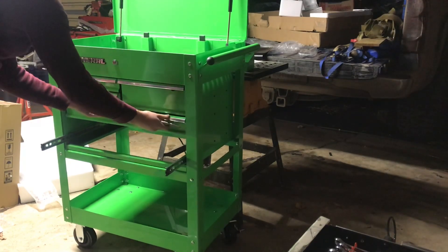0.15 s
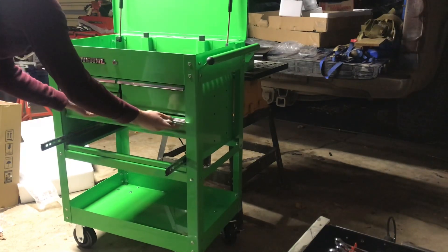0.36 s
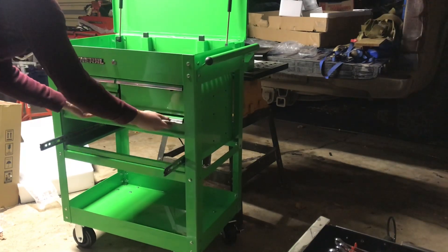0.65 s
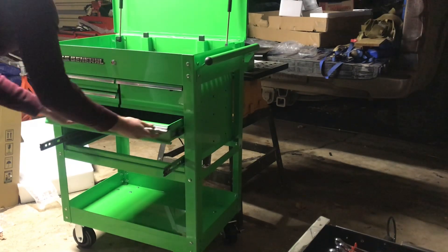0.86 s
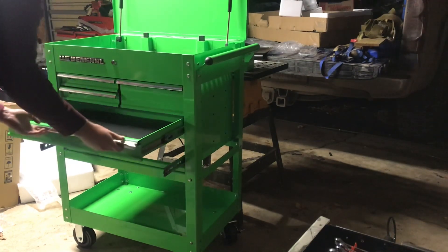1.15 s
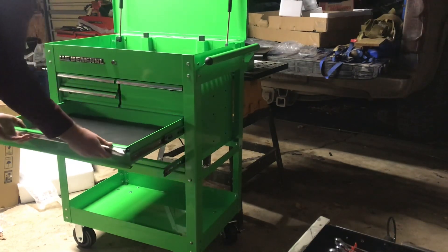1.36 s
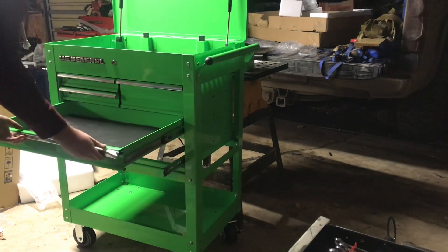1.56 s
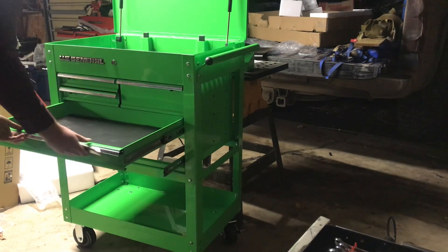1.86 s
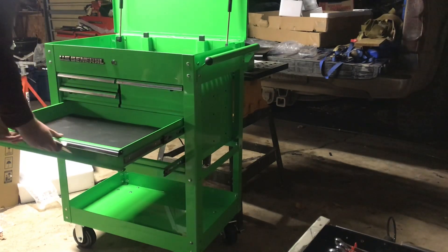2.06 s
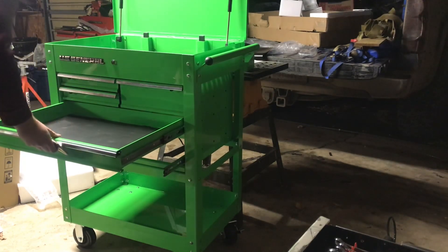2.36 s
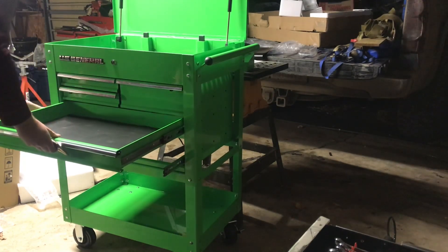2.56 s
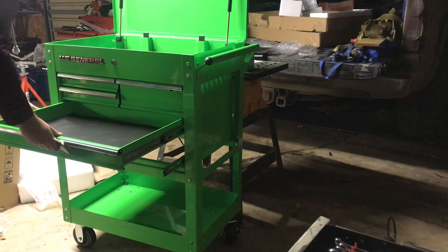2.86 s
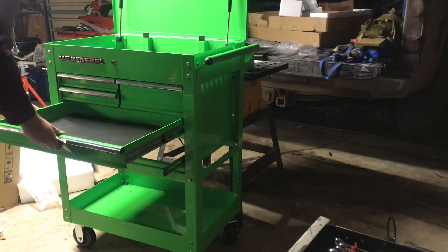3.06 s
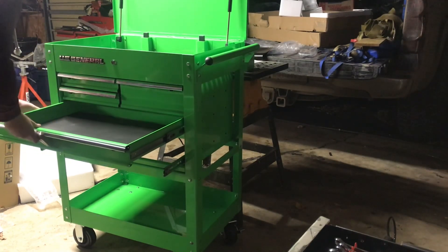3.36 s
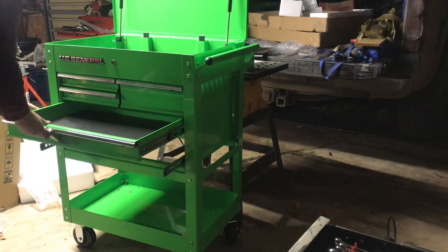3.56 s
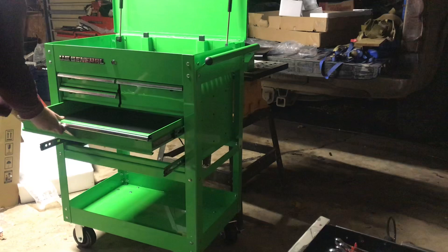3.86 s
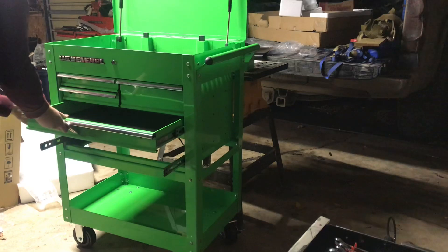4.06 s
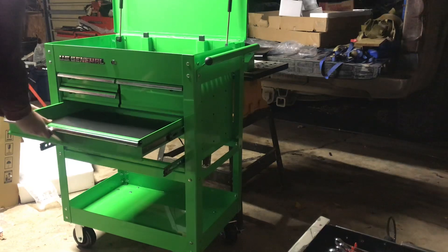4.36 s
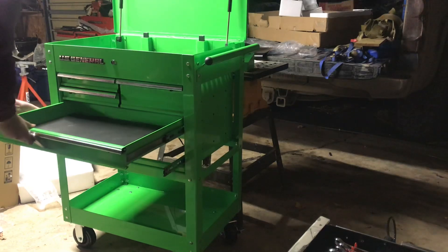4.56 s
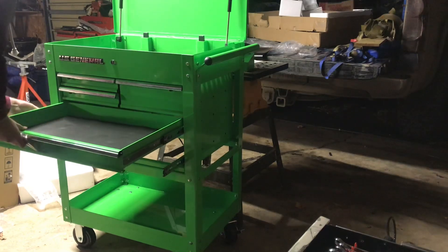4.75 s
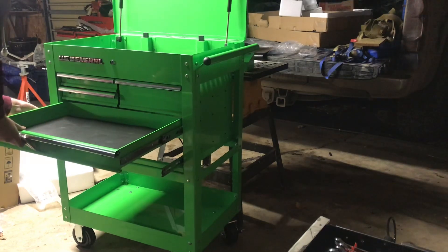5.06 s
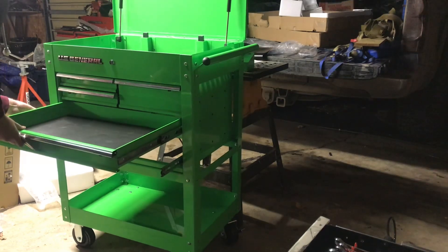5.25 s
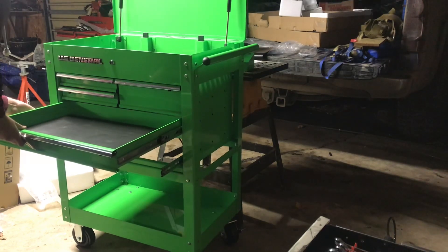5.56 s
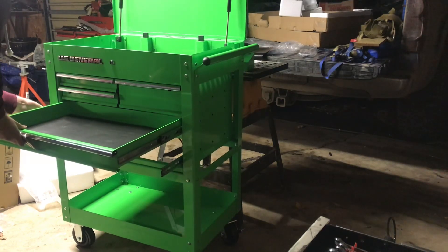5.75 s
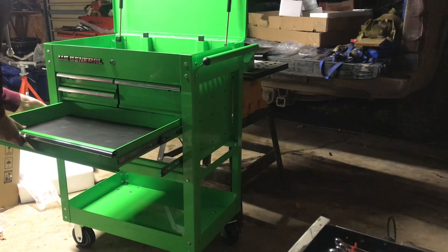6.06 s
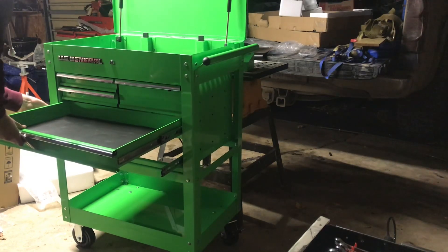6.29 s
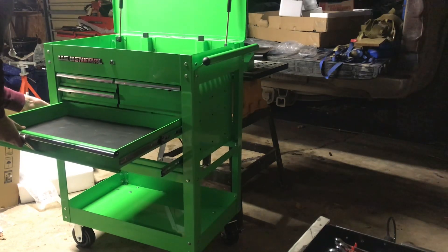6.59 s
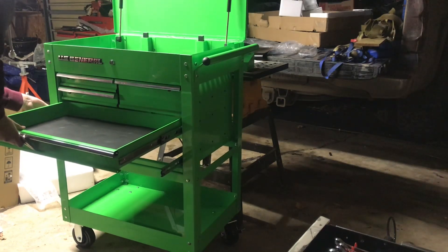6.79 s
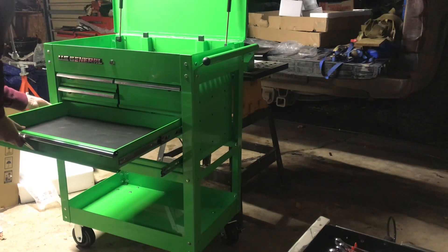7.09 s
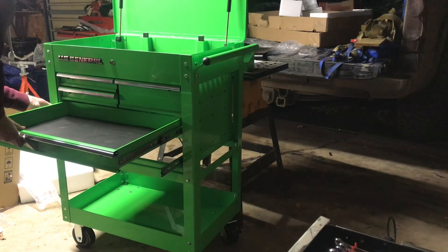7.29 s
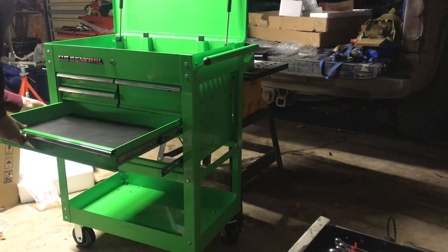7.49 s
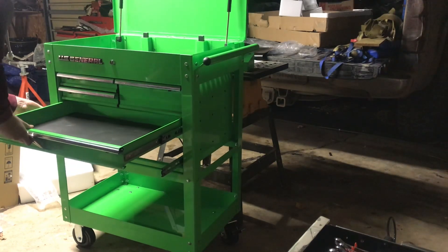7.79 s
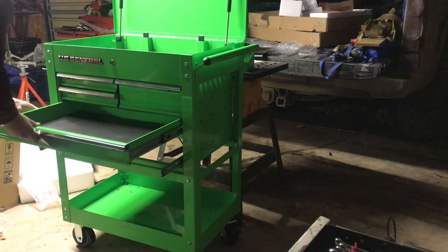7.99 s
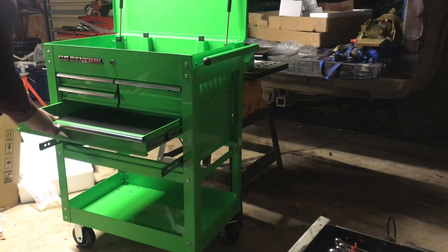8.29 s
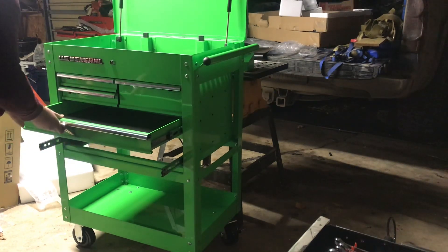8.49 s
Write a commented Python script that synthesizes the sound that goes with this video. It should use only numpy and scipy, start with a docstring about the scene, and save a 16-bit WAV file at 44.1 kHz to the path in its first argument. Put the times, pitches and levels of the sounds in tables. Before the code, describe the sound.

Close, mono view of an empty steel drawer on a tool cart in a quiet garage, over faint hiss and distant low rumble. From 0.06 to 0.23 s a rapid cluster of loud, bright clanks with chattering rattle and low thumps rings the thin sheet metal. Smaller clacks come at 0.5-0.6 s, then a gritty rolling scrape on ball slides from 0.7 to 1.6 s with light knocks near 1.1 s. A clack at 1.7 s; a firmer hollow clunk at 2.2 s. Quiet, with slight rubs, until about 3.2 s. Scraping swells from 3.4 to 4.8 s, in and out, ending in a hard knock at 4.83 s with a low ring. Then mostly faint rubs and ticks: a strong ringing clank at 5.75 s, soft taps near 7 s, a clunk at 7.5 s, a bright sharp clack at 8.02 s, and a small tick at 8.4 s before it fades by 8.6 s.

```python
"""In a quiet garage a steel drawer is worked out and in on the ball slides of a tool cart.
Rolling balls and rubbing rails, made as random knocks, excite the decaying modes of the sheet steel.
Stops and latches strike it in short bursts of chatter; single modes ring or sing alone as swelling tones.
Under it lie a low rumble and the hiss of room and microphone, both made of filtered noise."""
import sys
import numpy as np
from scipy import signal
from scipy.fft import rfft, irfft, next_fast_len
from scipy.io import wavfile
from scipy.ndimage import uniform_filter1d

SR = 44100
rng = np.random.default_rng(int(sys.argv[2]) if len(sys.argv) > 2 else 0)


def dump_mix(stems):
    """Bounce the given channels to the path in sys.argv[1] as a 16-bit WAV at rate SR."""
    frames = np.atleast_2d(stems).T  # one column per channel
    limited = np.clip(frames, -1, 1)  # hard clip at full scale
    pcm = np.round(limited * 32767).astype(np.int16)
    wavfile.write(sys.argv[1], SR, pcm)


N = 380583

# Single modes of the drawer. Each row: frequency in Hz, relative level in dB,
# 60 dB decay time in s before joints and liner limit it.
STEEL_MODES = [(143.5, -5.5, .45), (221, -10, 0.6), (305, -9.5, 1), (323, -1.76, 0.23), (376, -5.5, .4),
               (519, -7.5, 0.12), (592, -13.5, 0.11), (666, -5.5, 0.41), (626, -3.5, 0.75),
               (693.5, 4.66, 1), (747, -8, 0.2), (849, -8, 0.15), (972, 1.5, 0.9), (1040, 5.5, 0.62),
               (1057, -9, 0.51), (1267, -8, 0.34), (1420, -3, 0.57), (1478, 1, .3), (1473, -5, 0.6),
               (1695, -11, 0.87), (2200, -21, 0.083), (2530, -4.5, 0.75), (2594, -0.5, 0.66),
               (2756, -8.5, 0.41), (3140, -16.5, 0.25), (3740, -26, 0.071), (3120, -13.5, 0.022),
               (4000, -11.5, 0.59)]


def from_db(db):
    """Amplitude ratio: twenty decibels are a factor of ten."""
    return 10 ** (np.asarray(db) / 20)


def rms_one(x):
    """Normalisation to unit root-mean-square amplitude."""
    return x / np.sqrt(np.mean(x ** 2) + 1e-20)


def in_time(rows):
    """Envelopes: straight lines in time through the breakpoints of each column."""
    s, *columns = np.transpose(rows)
    return [np.interp(np.arange(N) / SR, s, column) for column in columns]


def at_hz(points_hz, values, hz):
    """Spectral interpolation on a logarithmic frequency axis, as pitch is heard."""
    return np.interp(np.log(np.maximum(hz, 1)), np.log(points_hz), values)


def coloured(x, spectrum):
    """Linear filtering: a table of (Hz, dB) weights the spectrum of x; the result has rms 1."""
    size = next_fast_len(len(x))
    hz = np.arange(size // 2 + 1) * SR / size
    gain = from_db(at_hz(*np.transpose(spectrum), hz))
    return rms_one(irfft(rfft(x, size) * gain, size)[:len(x)])


def band(x, low_hz, high_hz):
    """Band limitation by a Butterworth filter."""
    sos = signal.butter(2, [low_hz, high_hz], "band", fs=SR, output="sos")
    return signal.sosfilt(sos, x)


def grains(size, per_s, spread_db):
    """Shot noise: random contacts of uneven strength and either sign."""
    draw = rng.random((3, size))
    strength = from_db(-spread_db * np.log(draw[1] + .01)) * np.sign(draw[2] - .5)
    return (draw[0] < per_s / SR) * strength


def drift(rate):
    """Low-passed noise: a slow random wander of unit spread, with its corner at rate in Hz."""
    step = 40   # samples between computed points
    r = np.exp(-2 * np.pi * rate * step / SR)
    noise = rng.standard_normal(N // step + 2002)
    slow = signal.lfilter([1], [1, -2 * r, r * r], noise)[2000:]
    return np.interp(np.arange(N) / step, np.arange(len(slow)), rms_one(slow))


def steel():
    """Modal superposition: beating sines and noise bands, with their pitches and falls in dB."""
    # Countless close modes and the garage, heard as dying noise.
    # Each row: frequency in Hz, relative level in dB, 60 dB decay time in s.
    wash_table = [(150, -20, 0.66), (304, -15, .45), (500, -15, 0.55), (700, -16.5, 0.69), (1010, -10, .35),
                  (1420, -3, 0.2), (2090, -15.5, 0.32), (2593, -4, 0.27), (4867, -13.5, 0.28),
                  (7227, -8, 0.22), (9900, -13, 0.17), (14300, -5.5, 0.2), (15500, -8.5, 0.067)]
    t = np.arange(SR // 2) / SR
    hz, level_db, t60 = np.transpose(STEEL_MODES)
    t60 = np.minimum(t60, .12 + 110 / hz)   # joints and liner mat soak up the higher modes
    # each mode has a close twin, 8 to 30 Hz away
    beat = 1 + .5 * np.cos(2 * np.pi * (rng.uniform(8, 30, (len(hz), 1)) * t))
    modes = from_db(level_db - 8.0)[:, None] * beat * np.sin(2 * np.pi * hz[:, None] * t)

    edges = 110 * 2 ** np.arange(0, 7.4, 1 / 3)   # third-octave bands
    centres = np.sqrt(edges[1:] * edges[:-1])
    wash_hz, wash_db, wash_t60 = np.transpose(wash_table)
    wash = np.array([rms_one(band(rng.standard_normal(len(t)), low, high))
                     for low, high in zip(edges, edges[1:])])
    wash *= from_db(at_hz(wash_hz, wash_db, centres))[:, None]

    hz = np.r_[hz, centres]
    t60 = np.r_[t60, at_hz(wash_hz, wash_t60, centres)]
    return t, np.vstack([modes, wash]), hz, -60 * t / t60[:, None]


def ball_hiss(rails_db, hiss_db):
    """Shot noise of rolling contact: dense small impacts of the balls, coloured into a hiss."""
    # Spectrum of the balls. Each row: frequency in Hz, relative level in dB.
    ball_spectrum = [(2500, -15.5), (3600, -2), (5000, -5.5), (7500, -6.5), (10200, -10.5), (12800, -1),
                     (14300, -10.5), (16000, -9.5)]
    split_hz, gap_db, follows = 9000, 10, 0.42   # follows: dB of fill per dB of excess
    level = from_db(hiss_db + 1.2 * drift(14))
    hiss = level * coloured(grains(N, per_s=6400, spread_db=-2.0), ball_spectrum)
    lower = signal.sosfilt(signal.butter(2, split_hz, fs=SR, output="sos"), hiss)
    # below the split the hiss fills in as the rails outweigh the balls
    excess_db = np.clip(rails_db - hiss_db - gap_db, -15, 8)
    return hiss + lower * (from_db(follows * excess_db) - 1)


def sliding(t, rings, hz, fall_db):
    """Modal excitation by a travelling contact: ever other modes take the knocks on the rails."""
    # One list for each move of the drawer.
    # Each row: time in seconds, rails level in dB, ball hiss level in dB before wander and fill.
    moves = [
        [(0.0, -43, -65), (0.022, -57.5, -65), (0.035, -50, -65)],
        [(0.33, -45.5, -51), (0.406, -58.5, -66), (0.446, -48.5, -67), (0.505, -48, -63.5)],
        [(0.68, -49, -67.5), (0.722, -62, -70), (0.778, -47, -59), (0.806, -39.5, -48.5), (0.87, -48.5, -67.5),
         (0.954, -40, -54.5), (1.15, -45.5, -50), (1.176, -45.5, -52), (1.362, -46.5, -53), (1.602, -69.5, -71),
         (1.665, -79, -81.5)],
        [(1.87, -68, -70), (1.992, -61.5, -63.5), (2.054, -60, -69), (2.104, -59, -65.5), (2.15, -51, -63)],
        [(2.33, -79, -82), (2.632, -77, -89), (2.708, -70.5, -67), (2.766, -56, -77), (2.818, -63.5, -73),
         (2.876, -49.5, -62), (2.896, -57.5, -75), (3.004, -54.5, -70), (3.06, -66, -83), (3.14, -65.5, -79.5)],
        [(3.2, -67.5, -63.5), (3.366, -49, -57.5), (3.388, -55, -59.5), (3.456, -43, -57.5), (3.56, -53, -68),
         (3.632, -44.5, -57), (3.788, -48, -66.5), (3.822, -45, -61), (3.948, -47, -62), (3.986, -42.5, -68),
         (4.12, -67.5, -75)],
        [(4.16, -68, -82.5), (4.194, -55, -67), (4.384, -40, -55), (4.714, -44.5, -50.5), (4.8, -44.5, -62.5)],
        [(4.93, -72, -71), (4.952, -50, -56), (5.086, -73.5, -83.5), (5.136, -72, -75.5), (5.31, -51, -65),
         (5.33, -62, -76.5)],
        [(5.41, -67, -66.5), (5.458, -74.5, -75), (5.648, -80, -80), (5.658, -60.5, -67.5), (5.725, -52.5, -68)],
        [(5.86, -47.5, -64), (6.0, -51.5, -67), (6.1, -76, -84.5), (6.2, -84.5, -73.5)],
        [(6.25, -69, -79.5), (6.39, -73.5, -84.5), (6.424, -57, -72), (6.55, -51.5, -69.5), (6.654, -78.5, -85),
         (6.896, -78.5, -85), (6.95, -56, -73.5)],
        [(7.1, -64.5, -80), (7.182, -80, -96), (7.43, -80, -86), (7.46, -66, -68.5)],
        [(7.62, -56.5, -64), (7.7, -63.5, -66), (7.752, -66.5, -82.5), (7.8, -66, -64), (7.836, -51.5, -57.5),
         (7.91, -59, -74), (8.005, -49, -56)],
        [(8.17, -70.5, -60), (8.194, -62, -61), (8.36, -63.5, -61)],
        [(8.44, -72, -70), (8.54, -75, -84), (8.63, -79.5, -67)],
    ]
    # Rows: floor panel, side walls, rails, upper ring. Each row: level in dB at the usual levels,
    # share of the rails' swing, share of the balls' swing (dB per dB), wander in dB.
    part_levels = [(-59, 0.54, .1, 1), (-56.5, .9, .05, 1), (-53.5, 0.96, 0.054, 1.2),
                   (-64.5, .6, 0.6, 0.8)]
    # Frequencies in Hz between which the modes belong to one part after another.
    part_edges_hz = [200, 520, 860, 2000, 3600]
    usual_rails_db, usual_balls_db = -52, -62
    rails_db, hiss_db = in_time(np.vstack(moves))
    parts_db = []
    for usual_db, rails_share, balls_share, wander_db in part_levels:
        swing_db = rails_share * (rails_db - usual_rails_db) + balls_share * (hiss_db - usual_balls_db)
        parts_db.append(usual_db + swing_db + wander_db * drift(9))
    hiss = ball_hiss(rails_db, hiss_db)

    hop, part = 1024, np.searchsorted(part_edges_hz, hz)
    # hands on the drawer shorten the ring
    held = rings * from_db(fall_db - 60 * t / .2) * np.minimum(t / 0.0053, 1)
    held = held[:, :8192]
    hops = len(range(0, N, hop))
    travel = uniform_filter1d(rng.standard_normal((hops, len(hz))), size=4, axis=0) * 2
    share = from_db(2.5 * travel)
    energy = share ** 2 * np.sum(held ** 2, axis=1)
    for k, level_db in enumerate(parts_db):
        mine = part == k + 1
        # the modes of a part together carry its level
        gain = from_db(level_db[::hop]) / np.sqrt(energy[:, mine].sum(axis=1))
        share[:, mine] *= gain[:, None]
    share[:, (part == 0) | (part > len(parts_db))] = 0   # modes outside the parts stay silent

    grit = grains(N, per_s=1000, spread_db=3.5)
    knocks = np.pad(rms_one(grit) * from_db(.7 * drift(9.5)), (hop, 2 * hop))
    out, fade = np.zeros(N + 16 * hop), np.hanning(2 * hop)   # overlapping blocks crossfade
    for k, ring in enumerate(share @ held):
        sound = signal.fftconvolve(knocks[k * hop:(k + 2) * hop] * fade, ring)
        out[k * hop:k * hop + len(sound)] += sound
    return out[hop:N + hop] + hiss


def rumble():
    """Addition of powers: two wandering bands of low noise swell as heavy blows shake cart and concrete."""
    # Distant rumble. Each row: time in seconds, deep band in dB, low band in dB, before wander.
    rumble_levels = [(0, -62.5, -56.5), (.9, -61.5, -58.5), (1.6, -63, -64), (2.3, -61, -66),
                     (3.2, -63.5, -66), (4.2, -58.5, -62), (5.3, -62.5, -65.5), (6.1, -68, -66),
                     (6.9, -69, -70.5), (7.9, -64.5, -65.5), (8.63, -67, -68.5)]
    # Heavy blows. Each row: start in seconds, peak of the deep band in dB, of the low band in dB.
    shakes = [(.06, -65, -42), (.14, -48, -38.5), (.23, -44, -48), (.55, -68, -51.5), (1.05, -69, -50),
              (1.361, -54.5, -54.5), (1.85, -51, -70), (4.74, -38.5, -46.5), (5.75, -67, -47),
              (7.49, -57, -46)]
    # each pair: deep band, low band
    bands_hz, wanders_db = [(46, 62), (71, 180)], (1.5, 2)
    rises_s, t60s = (0.043, 0.018), (0.27, 0.67)
    out, t = 0, np.arange(N) / SR
    starts, *shakes_db = np.transpose(shakes)
    levels_db = in_time(rumble_levels)
    for k, (low_hz, high_hz) in enumerate(bands_hz):
        power = from_db(levels_db[k] + wanders_db[k] * drift(1.5)) ** 2
        for start, peak_db in zip(starts, shakes_db[k]):
            since = np.maximum(t - start, 0) / rises_s[k]   # in rise times
            after_s = np.maximum(since - 1, 0) * rises_s[k]
            power += (np.minimum(since, 1) * from_db(peak_db - 60 * after_s / t60s[k])) ** 2
        out = out + np.sqrt(power) * rms_one(band(rng.standard_normal(N), low_hz, high_hz))
    return out


def room_tone():
    """Stationary noise: the steady hiss of room and microphone."""
    # Spectrum of the hiss. Each row: frequency in Hz, relative level in dB.
    tone_spectrum = [(15, -25), (25, -8), (64, -3.5), (180, -4.5), (317, -4), (503, -14), (796, -9.5),
                     (1020, -8.5), (1890, -17.5), (6560, -21.5), (7710, -24), (12900, -14.5), (16000, -34)]
    return from_db(-68.5) * coloured(rng.standard_normal(N), tone_spectrum)


def chatter(t, decay_s):
    """Repeated impact: a first touch, the full blow and light bounces that die away."""
    burst = np.diff(grains(2001, per_s=2500, spread_db=-4.0))   # the difference favours treble
    burst = burst * np.exp(-t[:2000] / max(decay_s, 5e-4))
    burst = 1.2 * burst / np.linalg.norm(burst)
    burst[[rng.integers(45), 60]] = .22, 1   # first touch, then the full blow
    return burst


def clacks(t, rings, hz, fall_db):
    """Impulse response: each blow finds every mode with its own strength, repeated by its chatter."""
    # Each row: time of the full blow in seconds, blow level in dB, pitch of the struck part in Hz,
    # then floor panel, upper ring and treble in dB above that level before the blow colour,
    # and the chatter's decay time in seconds.
    blows = [(0.062, -19, 1180, -7, -20.5, -16.5, 0.003), (0.137, -18.5, 694, -7, -19, -14.5, 0.012),
             (0.164, -11, 719, -24, -9.5, 2, 0.0026), (0.178, -12.5, 660, -11, -6, -22, 0.004),
             (0.228, -11, 1030, -25, -7, 3, 0.0029), (0.536, -24.5, 649, -10, -7.5, -8.5, 0.0067),
             (0.581, -25.5, 665, -9, -18, -25, 0.005), (0.622, -28.5, 620, -6.5, -15.5, -18.5, 0.0043),
             (1.058, -31.5, 751, -7.5, -17, -20, 0.0051), (1.139, -30, 1020, -14, -14, -14, 0.004),
             (1.696, -26.5, 1410, -13, -27, -20.5, 0.003), (1.829, -34.5, 710, -26, -33.5, -32.5, 0.0043),
             (2.165, -19.5, 649, -25, -25.5, -38, 0.0031), (2.178, -27.5, 712, -18, -28, -21, 0.004),
             (2.225, -29, 915, -12, -32.5, -26.5, 0.0026), (3.336, -48, 1040, -16.5, 0.5, -13, 0.004),
             (3.449, -45, 1060, -21, -3, -15, 0.0035), (3.581, -37, 1540, -26, -21, -29, 0.004),
             (4.714, -32, 713, -12, -13, -8.5, 0.0034), (4.769, -29, 1020, -9, -18.5, -22, 0.004),
             (4.831, -15, 680, -21, -21, -13.5, 0.0023), (4.949, -39.5, 1530, -12.5, -15.5, -12, 0.0054),
             (5.174, -48.5, 1580, -3.5, -13, -15.5, 0.0047), (5.357, -51, 1380, -12, -5.5, 12.5, 0.004),
             (5.754, -17.5, 1110, -17.5, -15, -12.5, 0.0036), (5.78, -26.5, 1040, -6, -27, -34, 0.0034),
             (6.981, -38.5, 1440, -24.5, -15.5, -16, 0.004), (7.028, -37, 1430, -17, -15.5, -7, 0.0028),
             (7.489, -25, 1100, -20.5, -13, -4, 0.0054), (7.517, -26, 717, -14, -18.5, -12.5, 0.0086),
             (8.018, -19, 1110, -29, -4.5, 8.5, 0.0057), (8.388, -39.5, 1030, -10.5, -7.5, -5, 0.0049)]
    # Frequencies in Hz at which the colour of a blow is set.
    part_hz = [150, 220, 310, 680, 1040, 1500, 3000, 9000]
    # Blow colour: what every blow adds at those frequencies, in dB.
    blow_colour_db = [-25, -24.5, 0.5, -18.5, -19, -15.5, -1.5, -6]
    struck_gain_db, struck_octaves = 5.5, 0.67   # the struck part stands out
    damping = 0.78   # factor on the rate of fall
    spot_t60_s, carry_db, carry_loss_db_per_octave = 0.071, -3.5, 1.5   # carry_db holds at 1 kHz
    singles = len(STEEL_MODES)

    out = np.zeros(N + SR)
    snap = band(np.eye(1, 200)[0], 3000, 14000)   # the bare contact of steel on steel
    swell = 1 - np.exp(-t * hz[:, None] / .5)   # a panel takes part of a cycle to get going
    # the struck spot falls quiet fast, the panels carry on, less so in the treble
    panels = from_db(carry_db - carry_loss_db_per_octave * np.log2(hz / 1000))
    carry = from_db(-60 * t / spot_t60_s) + panels[:, None]
    for s, level_db, struck_hz, panel_db, ring_db, treble_db, chatter_s in blows:
        parts_db = np.add(blow_colour_db, [0, 0, panel_db, 0, 0, 0, ring_db, treble_db])
        octaves = np.log2(hz / struck_hz)
        struck_db = struck_gain_db * np.exp(-(octaves / struck_octaves) ** 2)
        luck = from_db(rng.normal(0, 1.5, len(hz))) * rng.choice([-1, 1], len(hz))
        strength = from_db(level_db + at_hz(part_hz, parts_db, hz) + struck_db) * luck
        # a random shift stirs the close modes anew
        wash = np.roll(rings[singles:], rng.integers(len(t)), axis=1)
        fresh = np.vstack([rings[:singles], wash])
        sound = strength @ (fresh * swell * carry * from_db(fall_db * damping))
        burst = chatter(t, chatter_s)
        sound[:len(snap)] += from_db(level_db + parts_db[-1] + 9.0) * snap
        sound = signal.fftconvolve(sound, burst)
        at = round(s * SR) - 60   # the full blow stands 60 samples into the burst
        out[at:at + len(sound)] += sound
    return out[:N]


def sings():
    """Modal resonance: single modes ring or sing alone after a blow or a slip, swell, waver and die."""
    # Each row: start in seconds, frequency in Hz, peak level in dB before waver,
    # rise in seconds, 60 dB decay time in seconds.
    tones = [(.345, 700, -44, 0.013, 0.79), (.55, 661, -32, 0.0072, 0.3), (.64, 681, -46.5, 0.026, 0.68),
             (.42, 1540, -49, 0.027, 0.33), (0.975, 291.6, -39, 0.035, 0.45), (1.268, 322, -45, 0.04, 0.46),
             (1.501, 323, -51.5, 0.042, 0.3), (1.9, 740, -56.5, 0.045, .5),
             (1.971, 1003, -47.5, 0.028, 0.18), (2.19, 8830, -58, .01, 0.13), (2.079, 1540, -54, .03, 0.17),
             (2.09, 752, -43.5, 0.017, 0.28), (2.165, 600, -41, 0.014, 0.11),
             (2.225, 941, -34.5, 0.0075, 0.1), (3.352, 2650, -46, 0.012, 0.057),
             (3.352, 3530, -46, 0.014, .05), (3.396, 3980, -49, 0.011, 0.046),
             (4.851, 322, -36, 0.0099, 0.37), (5.759, 1056, -25.5, 0.0081, 0.22),
             (5.768, 221, -47.5, 0.03, 1.6), (5.768, 323, -40, 0.015, .75),
             (5.965, 1040, -40.5, 0.02, 0.17), (7.52, 160, -45, 0.04, .3), (7.53, 709, -40, 0.009, 0.25),
             (8.021, 1470, -23.5, 0.0086, 0.088), (8.022, 323, -39, 0.023, 0.35)]
    out, waver = np.zeros(N), drift(30)
    for s, hz, peak_db, rise_s, t60 in tones:
        at = round(s * SR)
        t = np.arange(min(SR, N - at)) / SR
        rise = np.sin(np.pi / 2 * np.minimum(t / rise_s, 1)) ** 2
        fall = from_db(-60 * np.maximum(t - rise_s, 0) / t60)
        level = from_db(peak_db + 0.63 * waver[at:at + len(t)])
        out[at:at + len(t)] += level * rise * fall * np.sin(2 * np.pi * hz * t)
    return out


def scene():
    """Linear superposition of all sources, in one channel."""
    drawer = steel()
    tone = room_tone()
    return (clacks(*drawer) + sings() + sliding(*drawer) + rumble() + tone)[None]


def record(dry):
    """Band limitation: the deepest bass and the top are cut."""
    dry = signal.sosfilt(signal.butter(4, 38, "high", fs=SR, output="sos"), dry)
    return signal.sosfilt(signal.cheby2(16, 70, 16300, fs=SR, output="sos"), dry)


dry = scene()
out = record(dry)
dump_mix(out)
```